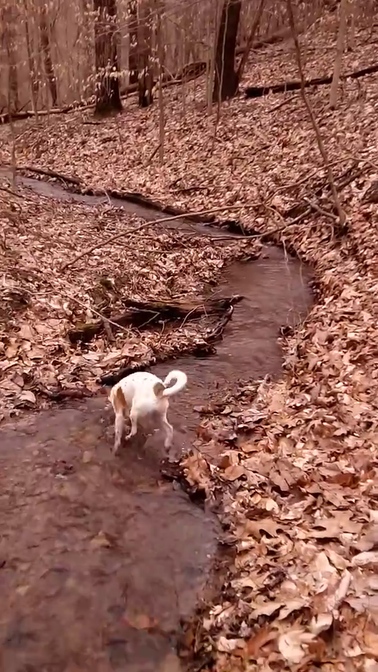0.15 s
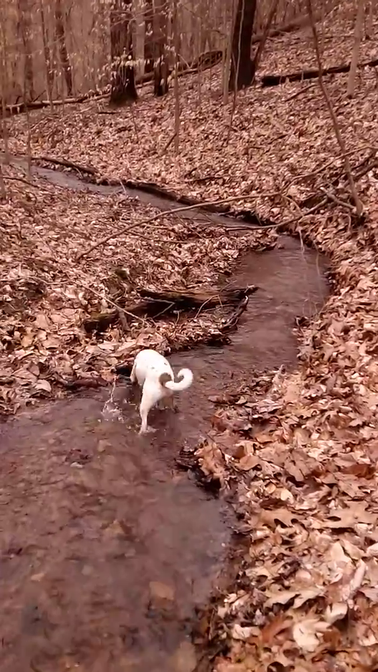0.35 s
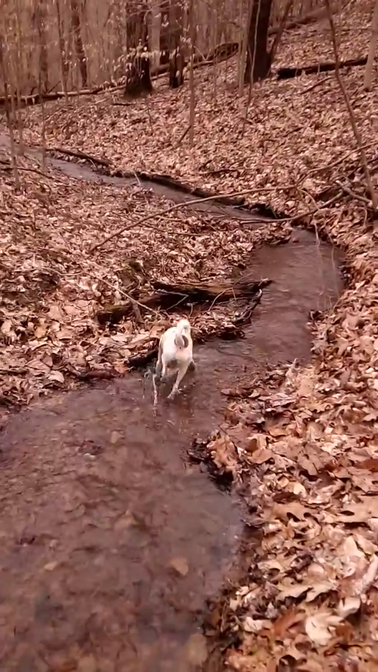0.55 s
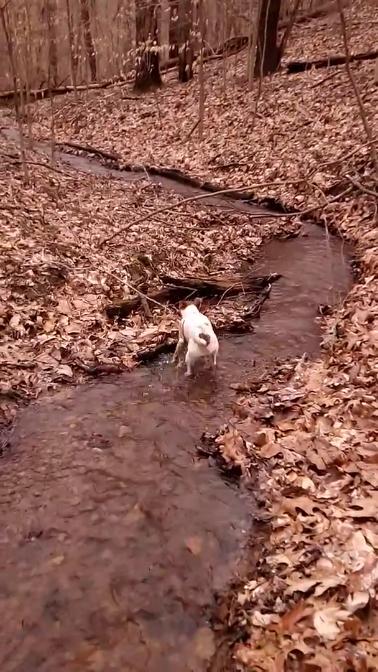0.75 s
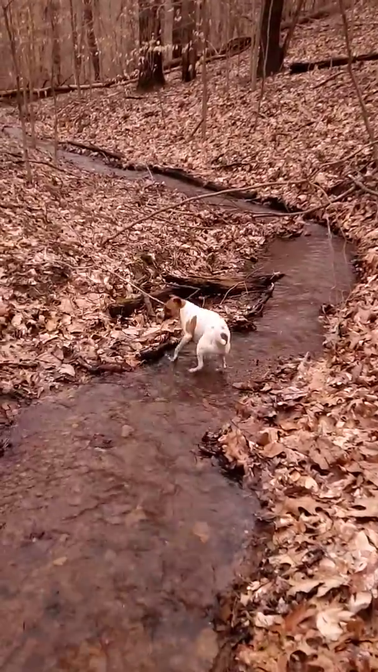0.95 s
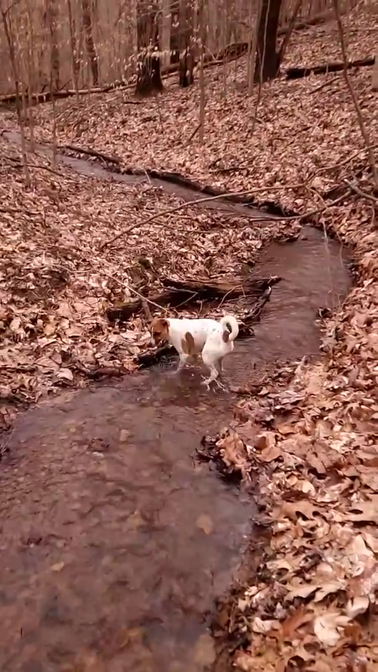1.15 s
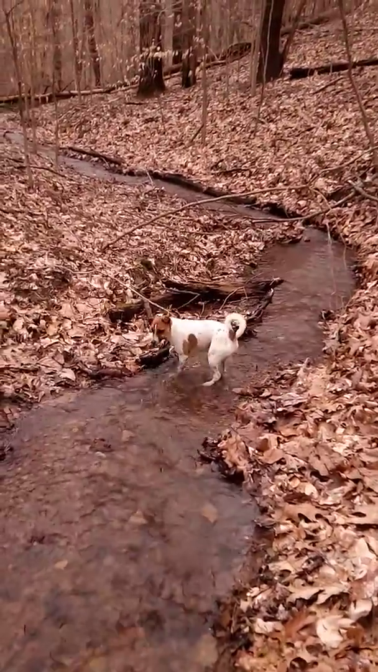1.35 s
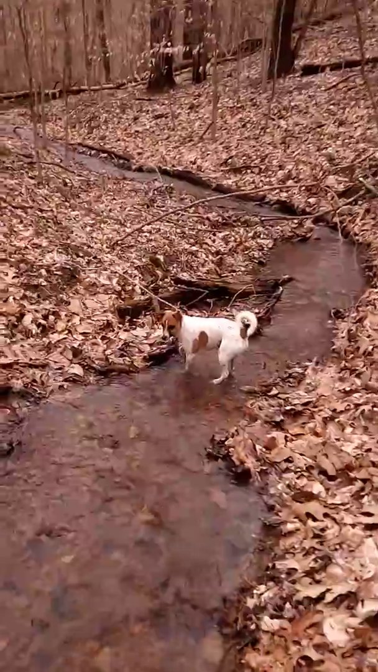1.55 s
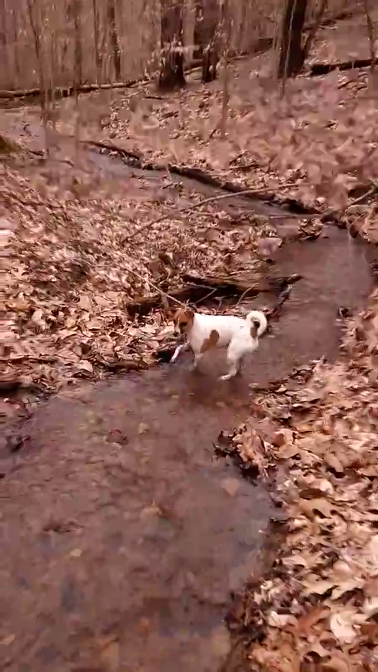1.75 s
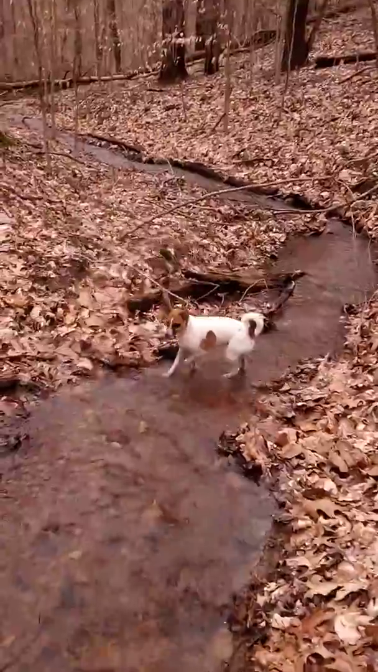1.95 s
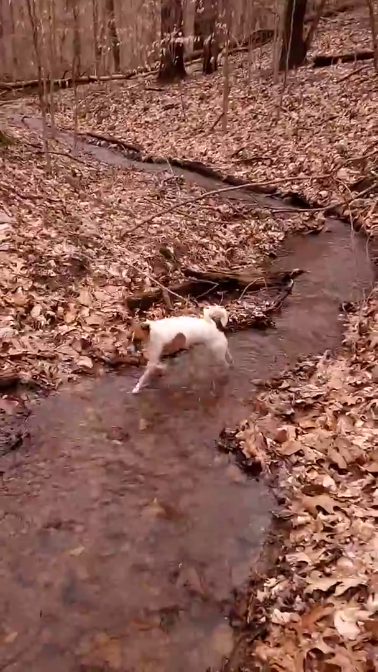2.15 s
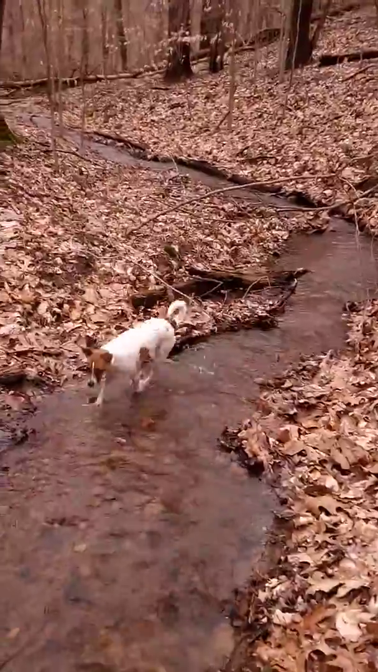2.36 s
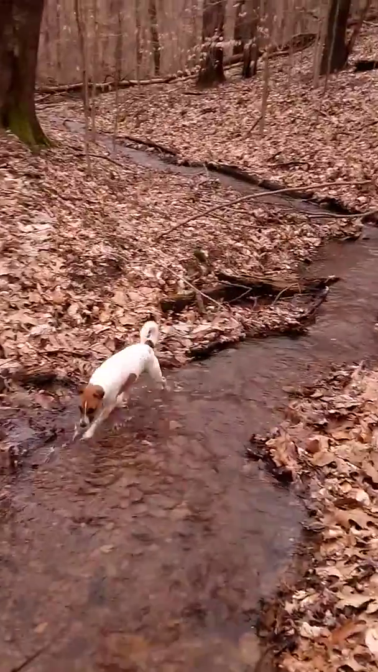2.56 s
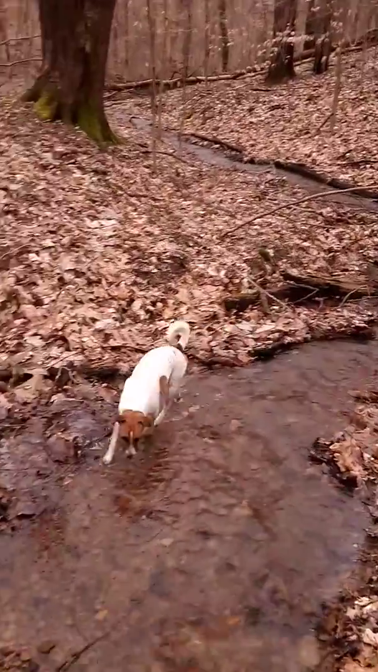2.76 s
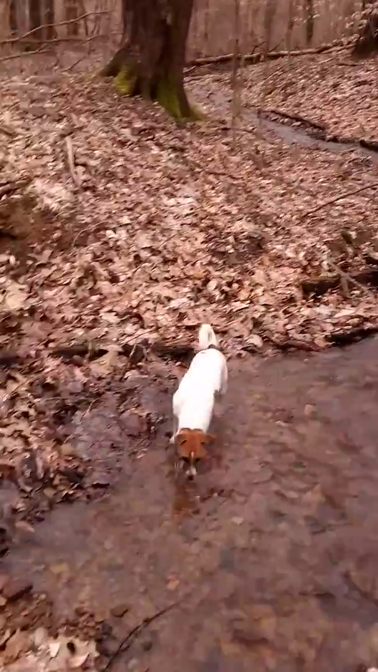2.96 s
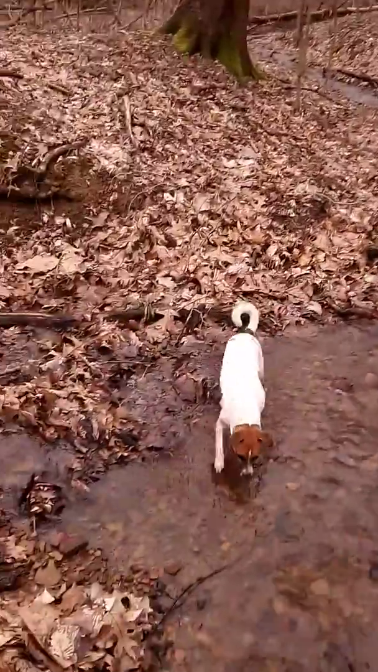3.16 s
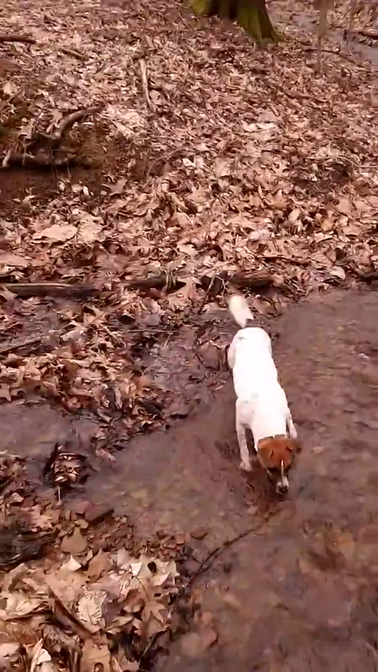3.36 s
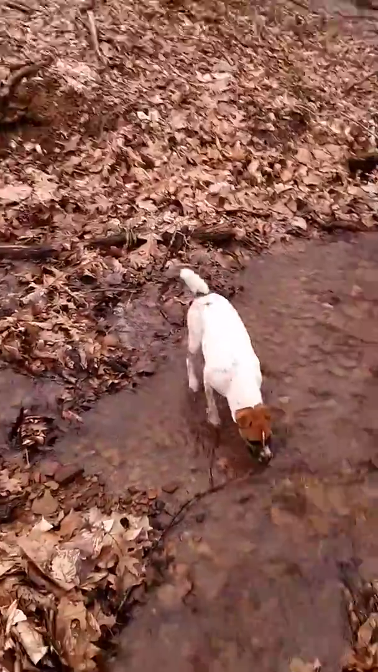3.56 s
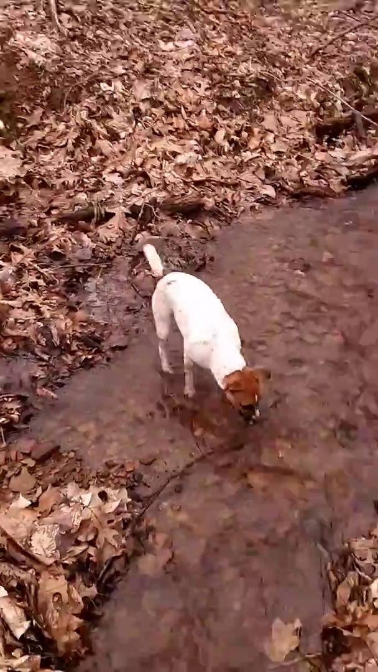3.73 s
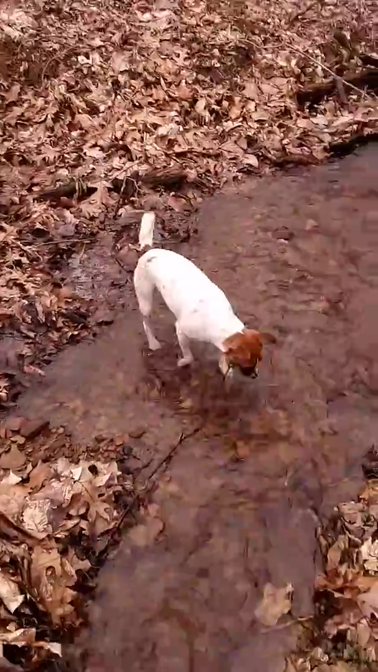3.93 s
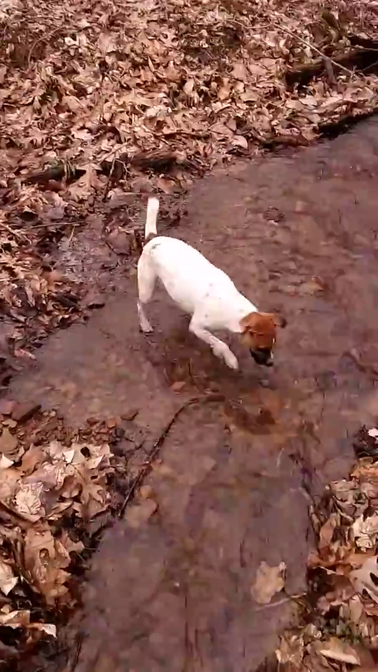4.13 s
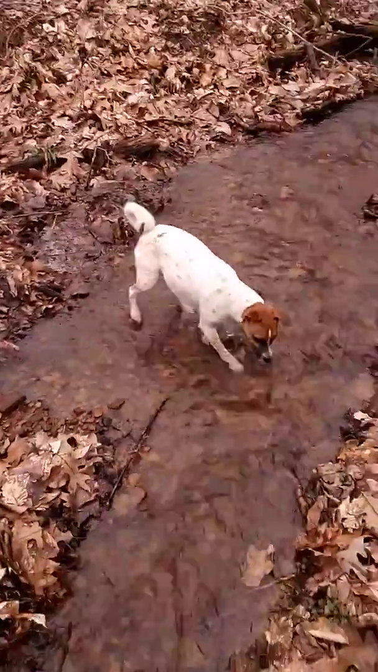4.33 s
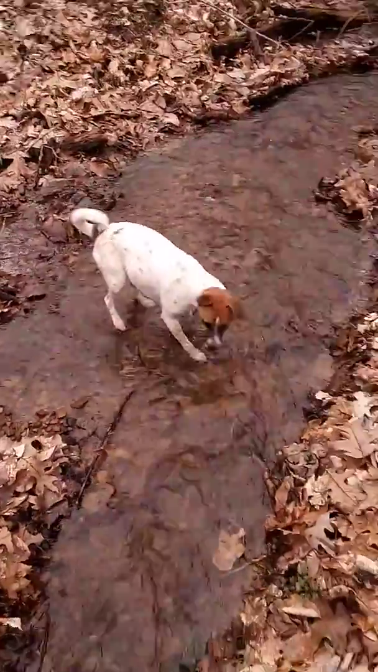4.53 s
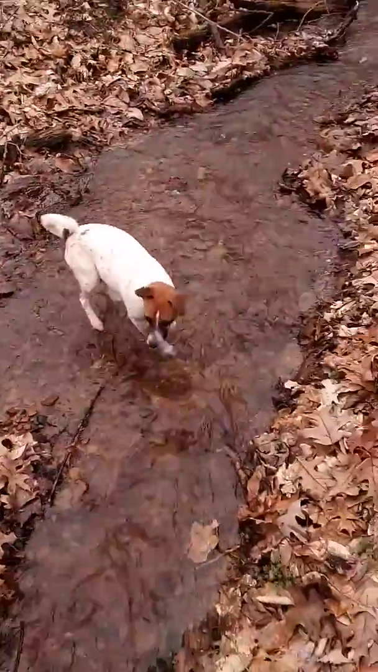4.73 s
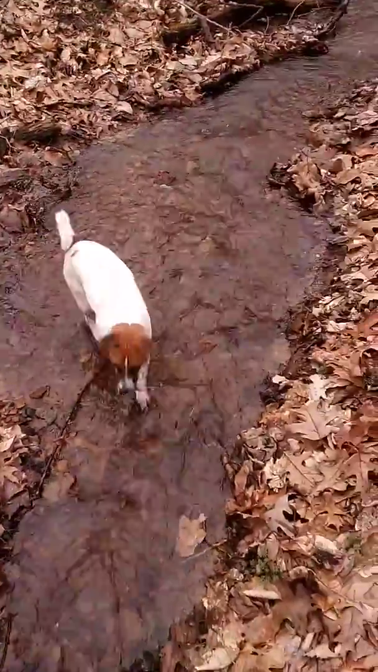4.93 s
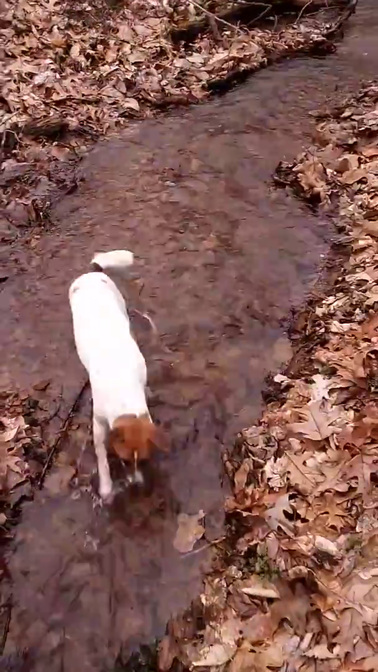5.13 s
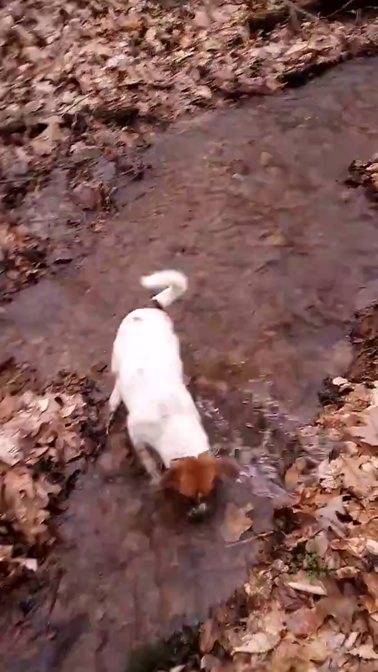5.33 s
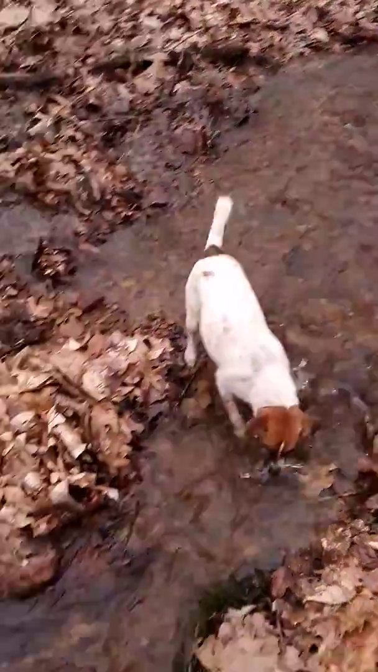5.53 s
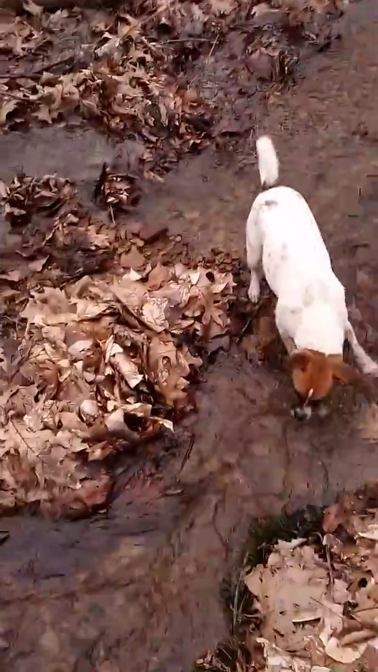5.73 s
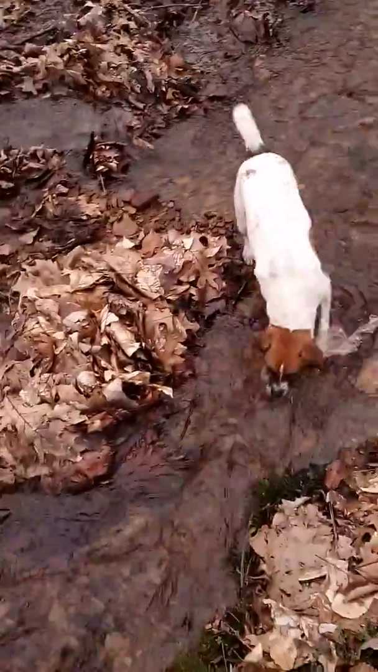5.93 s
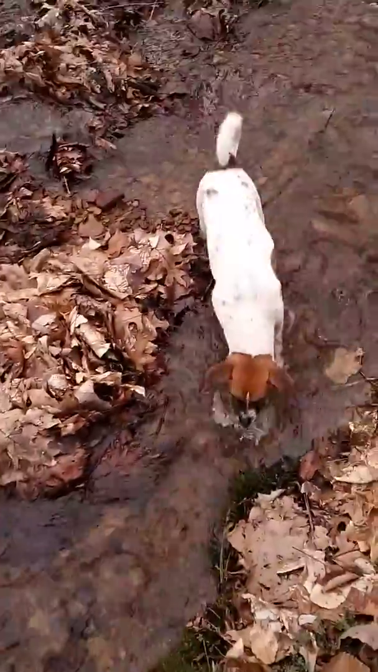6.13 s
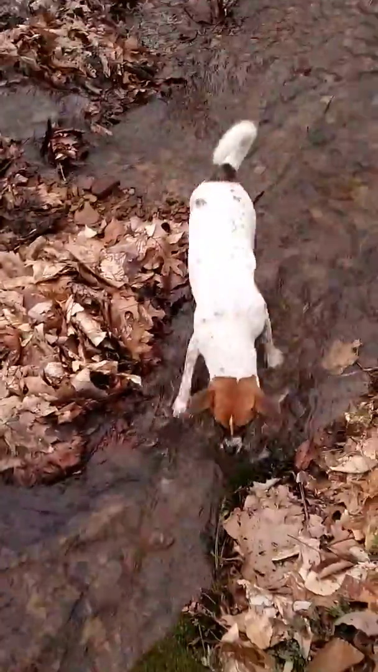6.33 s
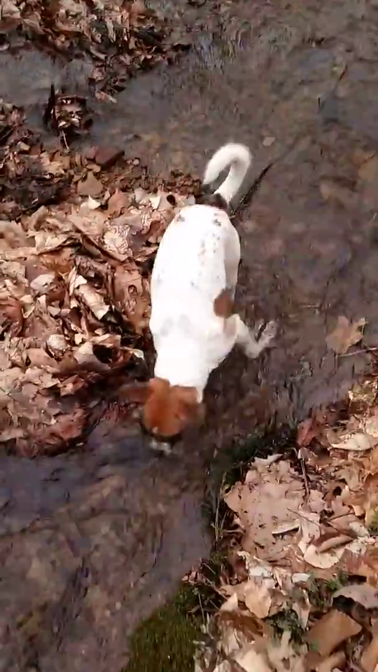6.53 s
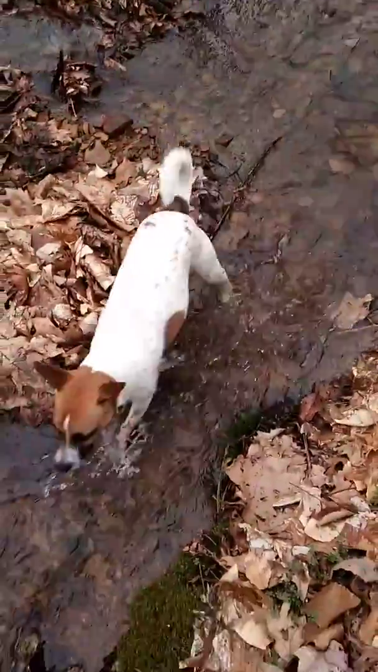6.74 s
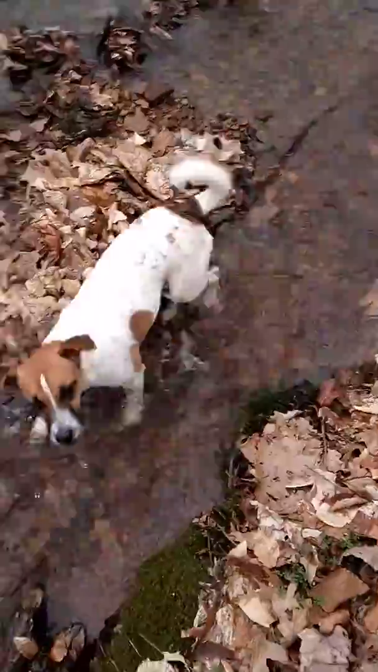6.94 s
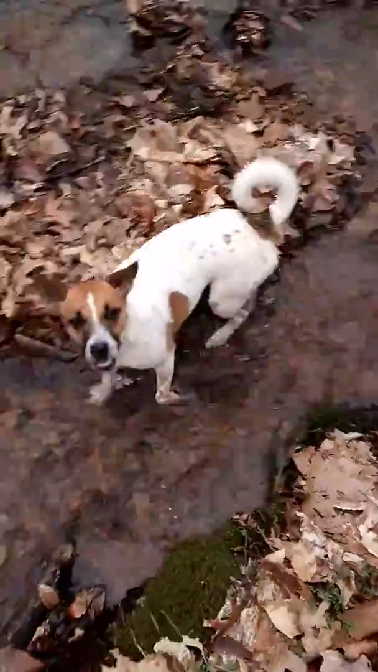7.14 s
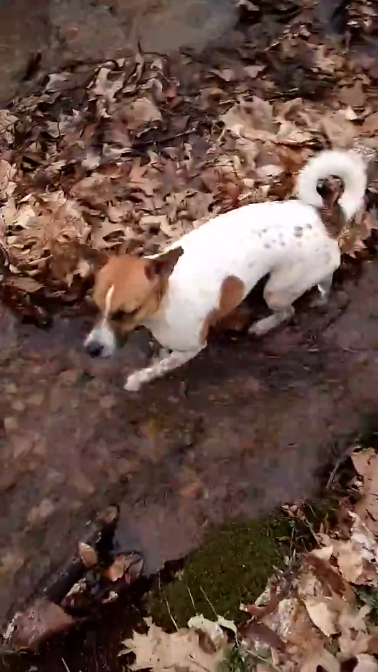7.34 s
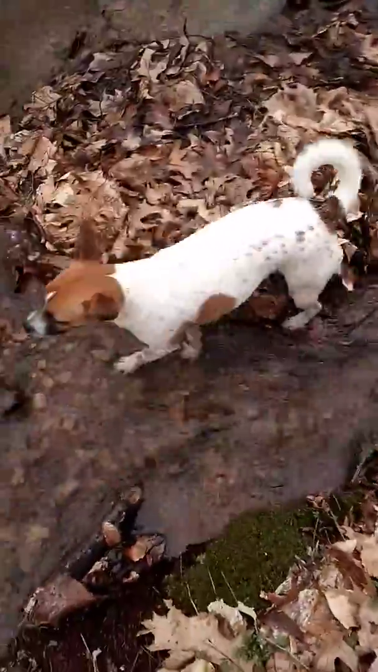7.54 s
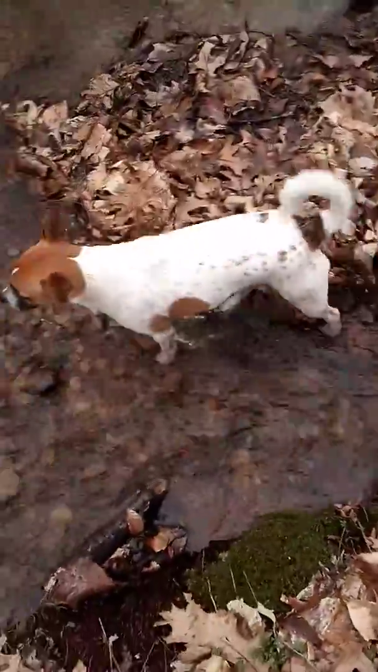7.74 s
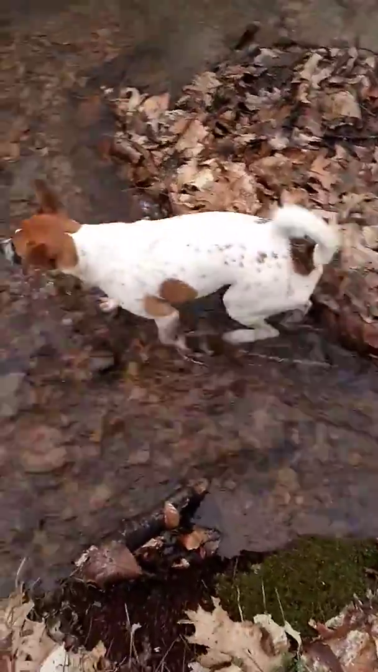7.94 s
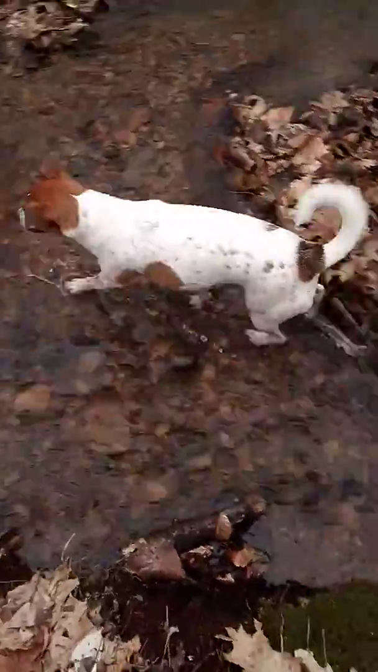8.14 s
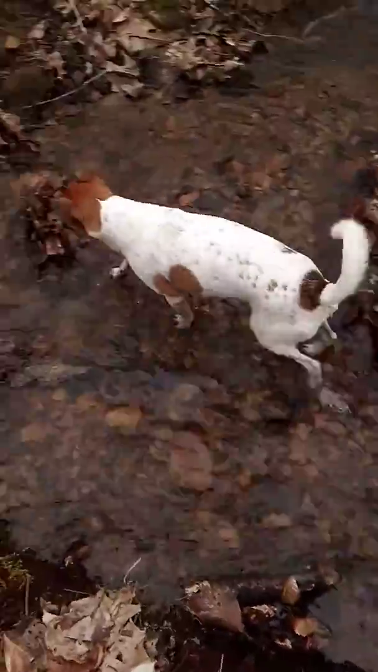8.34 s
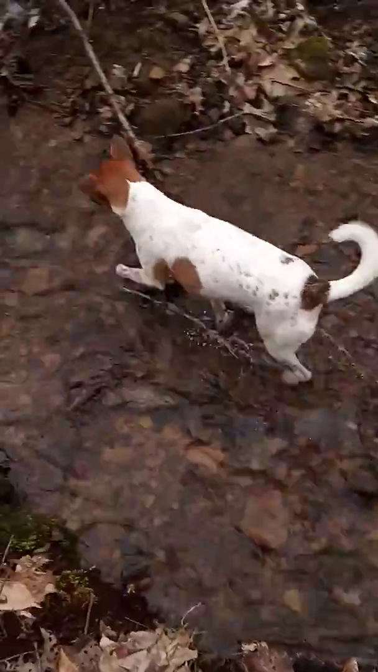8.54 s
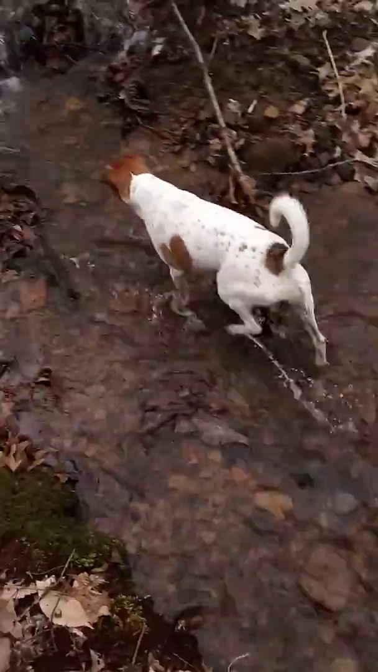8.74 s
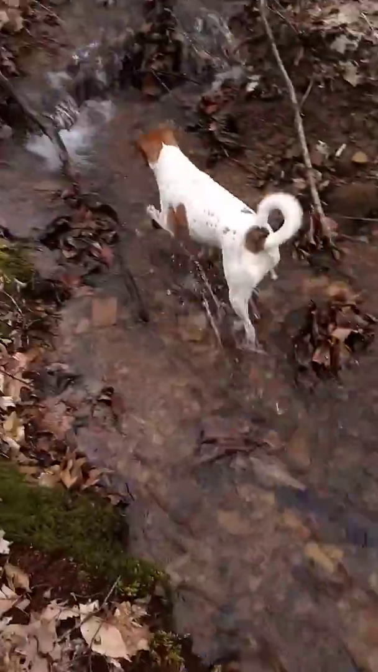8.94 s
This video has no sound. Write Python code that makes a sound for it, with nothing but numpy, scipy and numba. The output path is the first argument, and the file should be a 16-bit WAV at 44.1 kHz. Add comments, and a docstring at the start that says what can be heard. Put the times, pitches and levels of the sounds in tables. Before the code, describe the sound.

A shallow woodland creek babbles over stones while a small dog wades and splashes, the water growing louder and brighter toward a riffle.

```python
"""You hear a shallow woodland creek babbling over stones while a small dog splashes and plops about in it.
The water grows louder and brighter as the microphone follows the dog towards a riffle.
The creek is swarms of short ringing bubbles over a soft wash of noise; deep glugs and a faint rumble lie below.
Paws and muzzle throw up splashes, each a ringing bubble with a burst of spray and late droplets.
They also drag up bright swishes and churn up clusters of bubbles; single plops and drips ring out."""
import sys
import numpy as np
from scipy import signal
from scipy.fft import rfft, irfft, next_fast_len
from scipy.io import wavfile
from numba import njit

SR = 44100
rng = np.random.default_rng(int(sys.argv[2]) if len(sys.argv) > 2 else 0)


def master_out(mix):
    """Clip the mix to full scale and print it as 16-bit PCM to the path in sys.argv[1]."""
    frames = np.transpose(np.atleast_2d(mix))
    ceiling = np.clip(frames, -1, 1)
    pcm = np.round(ceiling * 32767).astype(np.int16)
    wavfile.write(sys.argv[1], SR, pcm)


N = 400428   # length in samples

# Faint, dull low bumps. Each row: start in seconds, relative peak in dB, pitch in Hz.
BUMPS = [(5.44, -72, 80), (5.87, -69, 85), (6.21, -62, 190), (6.66, -66, 75), (6.72, -59, 160),
         (6.80, -65, 78), (6.94, -68, 110), (7.069, -53, 195)]
RUMBLE_DB, RUMBLE_WAVER_DB = -89, 2   # middle level, and how far it wavers
# The loudest single glugs under the ledge. Each row: start in seconds, relative peak in dB, pitch in Hz.
LOUD_GLUGS = [(0.126, -58, 242), (0.323, -51, 330), (0.551, -62, 261), (0.965, -55.5, 320),
              (1.124, -49, 299), (1.294, -52, 317), (1.752, -52, 420), (1.877, -58, 270), (2.055, -54, 331),
              (2.233, -55, 310), (3.301, -56, 363), (3.603, -56, 283), (4.052, -48.5, 318),
              (4.819, -53, 301), (5.024, -57, 420), (5.502, -52, 245), (5.962, -54, 331), (6.489, -63, 328),
              (7.396, -50, 350), (7.639, -54, 304), (7.918, -55, 301), (8.097, -56, 366), (8.566, -52, 353),
              (8.783, -56, 382)]
GLUG_DB = -69.5   # level of the steady glugging
GLUG_WAVER_DB, GLUG_WAVER_HZ = 2.5, 6   # how far and how fast the birth of its bubbles wavers
# Colour of the water at the microphone. Each row: frequency in Hz, filter gain in dB.
WATER_COLOUR = [(59, -74), (100, -10), (177, -6.5), (233, -12), (314, 1.5), (388, -4.5), (544, -7),
                (732, -2), (1270, -6.5), (1900, -8.5), (2450, -4), (2720, -6.5), (4720, -8.5), (6630, -4),
                (8190, -16.5), (9500, -15.5), (12800, -26), (14100, -28), (14900, -14), (15800, -15)]
# A hollow in the water's colour that shifts as the microphone moves.
# Each row: time in seconds, centre in Hz, depth in dB (below zero is a hump).
HOLLOW = [(0, 1380, 2.5), (1.5, 1430, 5.5), (2.5, 1220, 8.5), (3.8, 1080, 3.5), (4.7, 1310, 4),
          (5.8, 1220, 6), (6.8, 1530, -2), (7.15, 1730, 4), (7.8, 1840, 11), (8.3, 1470, 2),
          (9.08, 1610, 8)]
# Creek level by bubble size as the microphone moves along. Each row: time in seconds, then the
# relative levels in dB of burble, gurgle, babble, trickle and fizz (large bubbles to small).
FLOW = [(0.0, -71.5, -60, -54.5, -53.5, -52.5), (1.39, -69.5, -59, -58, -62.5, -57),
        (1.52, -78, -61.5, -56.5, -63, -56.5), (1.69, -81, -60, -56.5, -57.5, -54.5),
        (1.92, -71, -60, -55, -60.5, -57), (2.25, -74, -60.5, -53.5, -57.5, -52.5),
        (3.03, -73, -56, -50.5, -60, -53.5), (3.61, -67, -55.5, -54, -59, -53.5),
        (3.74, -78, -55.5, -53.5, -59.5, -55), (4.55, -79, -61, -55, -62, -56.5),
        (4.87, -73, -57, -53, -58.5, -54.5), (4.93, -72, -57.5, -50.5, -52, -50.5),
        (5.21, -67.5, -53, -50.5, -52.5, -50), (6.12, -67, -52, -51.5, -51, -51),
        (6.25, -62, -54.5, -52.5, -56.5, -53.5), (6.34, -66, -55.5, -53.5, -49.5, -47.5),
        (6.55, -66, -54, -51.5, -49, -48.5), (6.98, -65.5, -55, -54.5, -55, -51),
        (7.42, -65, -58.5, -55, -53.5, -50.5), (7.99, -61, -55, -54, -47, -47.5),
        (8.3, -61.5, -54, -60, -47.5, -48), (8.72, -57, -56, -51, -44.5, -44.5),
        (9.08, -62.5, -64, -53, -48.5, -47)]
# The borders between those five ranges of pitch, in Hz.
RANGE_EDGES_HZ = [620, 1250, 2200, 4500]
# The same five ranges; the large bubbles come least evenly. Each row: extra gain in dB, waver in dB.
RANGE_WAVERS = [(1.5, 3.5), (-0.2, .5), (-0.1, 0.36), (-0.5, 1.34), (0.8, 0.32)]
WAVER_HZ = 6.8   # speed of that waver
TOP_FOLLOWS, TOP_DB = 0.67, -6   # above 8.5 kHz: extra share of the fizz's swing, and gain in dB
RIFFLE_S, RIFFLE_HALF_S, RIFFLE_DB = 8.7, 0.62, -47.5   # closest approach, half its length, level
# Paws swishing through the surface. Each row: start in seconds, relative level in dB,
# time to die away by 60 dB in seconds.
SWISHES = [(0.148, -24.5, 0.032), (0.275, -40, 0.17), (0.43, -38, 0.26), (0.518, -37.5, .2),
           (0.687, -40, 0.085), (1.924, -36, 0.18), (2.02, -37, .18), (2.1196, -37, .18),
           (2.308, -39, 0.28), (2.514, -41, 0.24), (2.8094, -35, 0.1), (3.112, -34, 0.088),
           (3.972, -39, .15), (4.604, -35.5, .11), (4.8884, -33, 0.12), (4.9387, -40, .18),
           (4.995, -33.5, 0.21), (5.03, -33, .15), (5.243, -30.5, 0.28), (5.8162, -32, 0.17),
           (6.3494, -34.5, 0.25), (6.5695, -30, 0.13), (6.79, -28, 0.051), (8.01, -29, .06),
           (8.2072, -28, .14), (8.297, -24, .015), (8.5594, -24, 0.12)]
# The dog churns the water and stirs up loose ringing drops.
# Each row: middle in seconds, half length in seconds, level in dB.
CHURNS = [(0.462, 0.084, -54), (2.34, 0.018, -48), (5.197, 0.22, -68), (5.655, 0.058, -46),
          (5.835, 0.062, -53), (6.38, 0.027, -44), (6.51, 0.041, -48), (6.644, 0.05, -49),
          (8.487, 0.032, -43)]
# Gulps, where a paw or the muzzle churns a cluster of bubbles under.
# Each row: start in seconds, relative bubble peak in dB, middle pitch in Hz, length in seconds.
GULPS = [(0.003, -29.5, 3600, 0.05), (0.213, -37, 3300, .09), (0.315, -37, 2920, 0.011),
         (0.43, -39, 2180, .03), (0.521, -32.5, 3400, .025), (1.945, -30.5, 3100, 0.03),
         (2.132, -32, 2470, 0.028), (2.198, -32.5, 2900, 0.037), (2.366, -35.5, 1820, .02),
         (2.42, -40, 2140, 0.028), (3.97, -36, 3680, 0.012), (4.075, -37, 1390, 0.024),
         (4.939, -36, 1660, 0.015), (5.022, -36, 860, 0.021), (5.064, -32, 2480, .01),
         (5.133, -45, 2100, 0.019), (5.226, -38.5, 790, 0.028), (5.237, -30, 2200, .025),
         (5.493, -31, 2200, .012), (5.613, -32, 2090, 0.015), (5.633, -39, 2700, 0.056),
         (5.814, -27, 2600, 0.042), (5.815, -32, 1110, 0.026), (5.86, -34, 2430, .04),
         (6.019, -29, 2330, 0.014), (6.182, -28.5, 4430, 0.0088), (6.209, -34, 1900, 0.006),
         (6.298, -38, 950, .02), (6.316, -28, 2500, .009), (6.351, -34, 2970, .05),
         (6.455, -28, 2740, 0.012), (6.576, -21.5, 3150, 0.011), (6.624, -34, 2500, 0.057),
         (8.204, -29, 3300, .028), (8.331, -30, 2700, 0.019), (8.416, -31, 2310, 0.015),
         (8.486, -32, 2900, 0.045), (8.56, -23, 5260, 0.023), (8.672, -31, 2900, .008),
         (8.704, -29, 3600, .012), (8.717, -19, 4230, 0.005), (8.943, -25, 2920, .008),
         (8.984, -30.5, 2410, 0.043)]
GULP_BUBBLES = 14   # bubbles in each cluster
# Single bubbles that ring out, from deep plops to small, high drips.
# Each row: start in seconds, relative peak in dB, pitch in Hz, cycles of ringing.
PLOPS = [(0.012, -32, 3780, 32), (0.036, -35, 3600, 45), (0.186, -28.5, 426, 4), (0.770, -40, 1150, 20),
         (1.109, -34.5, 2250, 26), (1.134, -35, 1160, 12), (1.214, -33.5, 1010, 13), (2.418, -36, 2490, 40),
         (2.961, -32, 1420, 16), (3.17, -42, 790, 16), (3.183, -36, 800, 22), (3.552, -38, 870, 19),
         (3.682, -36, 740, 33), (3.750, -31.5, 6700, 53), (4.068, -27, 490, 11), (4.076, -28, 895, 12),
         (4.401, -34.5, 950, 18), (5.021, -36, 880, 20), (5.025, -36.5, 464, 13), (5.030, -36, 1020, 31),
         (5.036, -38, 695, 20), (5.058, -38, 810, 18), (5.239, -39, 694, 27), (5.419, -34, 1020, 29),
         (5.496, -26.5, 1950, 21), (5.508, -32, 4500, 25), (5.579, -24.5, 1430, 11), (5.635, -27, 3300, 31),
         (5.816, -33, 3500, 38), (5.819, -28, 1070, 11), (5.923, -29, 2200, 28), (5.97, -30, 1530, 30),
         (6.209, -29, 1120, 12), (6.638, -27, 2070, 22), (7.302, -34.5, 780, 28), (7.423, -33, 3000, 30),
         (7.453, -35.5, 730, 23), (7.566, -28, 1240, 13), (7.581, -29, 4260, 30), (7.610, -33, 1170, 18),
         (7.702, -27, 3310, 31), (7.74, -32, 704, 12), (7.830, -36, 765, 16), (8.053, -28, 685, 13),
         (8.078, -33, 765, 18), (8.175, -35, 660, 17), (8.362, -36, 787, 21), (8.482, -28, 3910, 30),
         (8.512, -21, 2260, 22), (8.604, -28, 1270, 27), (8.635, -26, 7450, 40), (8.717, -31, 810, 16),
         (8.877, -24, 3630, 25), (8.944, -36.5, 353, 11)]
# Splashes. Each row: time in seconds, relative peak in dB, pitch of the main bubble in Hz,
# spray against that peak in dB, time for the spray to die away by 60 dB in seconds.
SPLASHES = [(0.185, -27, 5170, 7, 0.017), (0.316, -22, 6200, 2.5, .028), (0.360, -32, 6000, 10, 0.0076),
            (0.523, -26, 3620, -10, .04), (0.54, -23, 2830, -11, 0.051), (0.689, -28, 6540, -5, 0.023),
            (0.873, -29, 6340, 2.5, 0.028), (0.935, -27.5, 1780, -3, .02), (1.4436, -23.5, 1990, -25, .02),
            (2.031, -27, 2400, 3, .018), (2.087, -26, 5070, -16, .02), (2.1195, -28, 2400, -3, .018),
            (3.072, -24, 6300, -2, 0.024), (3.116, -26, 3050, 1, 0.03), (3.775, -35, 6400, -5, 0.017),
            (3.898, -21.5, 6200, -3, 0.015), (3.972, -24.5, 3730, 1, 0.029),
            (4.068, -19.5, 3580, -1, 0.012), (4.075, -29.5, 1590, 1, 0.084), (4.087, -25, 5400, -4, 0.016),
            (4.095, -32, 5050, 0, 0.026), (4.1322, -24.5, 3900, -13, .02), (4.139, -25, 5900, -12, .02),
            (4.34, -33, 3000, -12, .02), (4.76, -27, 3050, -7, .02), (4.889, -26, 1670, 2, 0.023),
            (5.1037, -21.5, 2100, 1, 0.02), (5.187, -21, 2290, 1, 0.023), (5.4876, -19, 2400, -10, 0.018),
            (5.508, -15.5, 6850, -4, 0.012), (5.6156, -23, 2140, -13, .02), (5.727, -15, 6670, -12, .02),
            (5.752, -16, 6600, -16, .02), (5.832, -28, 2600, 3, 0.048), (5.8646, -18, 2400, -12, .012),
            (5.893, -17.5, 3200, -15, .018), (5.955, -23, 1780, -19, .02), (6.118, -19, 1970, -8, 0.018),
            (6.184, -19, 4440, -5, 0.027), (6.213, -17.5, 2350, -10, .015), (6.317, -16, 2370, -2, 0.027),
            (6.4019, -13, 6600, -5, .012), (6.422, -18, 6500, -6, 0.035), (6.452, -17, 3550, -15, .008),
            (6.458, -17, 3430, -12, 0.028), (6.569, -19, 3400, -9, .02), (6.583, -17.5, 6230, 8, 0.0096),
            (6.605, -18, 2360, -4, 0.016), (6.639, -27, 1930, -6, .008), (6.679, -24, 4250, -6, .02),
            (6.784, -21, 3830, 1, 0.013), (6.794, -25, 6540, -1, 0.028), (7.63, -20.5, 2730, 0, 0.036),
            (7.691, -28, 2550, 2, 0.028), (7.8017, -22.5, 2720, 1, .015), (8.018, -16, 4100, -6, 0.04),
            (8.055, -14, 5760, -7, 0.016), (8.161, -16.5, 5960, -1, .006), (8.2166, -15, 2230, -1, 0.03),
            (8.2276, -22, 2370, 2, 0.028), (8.3367, -22, 2430, -1, .05), (8.382, -11, 5940, -3, 0.015),
            (8.423, -14, 6640, 3.5, 0.014), (8.481, -13.5, 6740, -12, .035), (8.496, -17, 6860, -3, 0.021),
            (8.508, -22, 2760, -1, .03), (8.5226, -10.5, 2360, -13, 0.018), (8.602, -11.5, 6500, -5, 0.017),
            (8.6216, -21, 6600, 4, 0.017), (8.675, -18.5, 2560, 0, 0.022), (8.717, -20, 4530, 7, 0.036),
            (8.769, -17, 6660, -10, .015), (8.8253, -18, 2620, -5, 0.032), (8.8756, -16, 2750, -12, 0.013),
            (8.889, -21, 2580, 0, .03), (8.9449, -9.5, 2540, -7, .015), (8.949, -10.5, 3180, -11, .02),
            (8.958, -15.5, 6550, -5, 0.025), (8.964, -20, 2090, 4.5, 0.015), (9.001, -9.5, 6700, -9, 0.024),
            (9.055, -11, 6630, -16, 0.011), (9.06, -9, 2870, 1, 0.011)]
SPRAY_GATHER_S, SPRAY_GATHER_DB = 0.021, -12   # spray builds up before the slap: 60 dB rise time, level under it
CUTOFF_HZ = 15900   # top of the sound


def from_db(db):
    """Decibels to gain."""
    return 10 ** (np.asarray(db) / 20)


def rms_one(x):
    """Scale to an rms (average strength) of 1."""
    return x / np.sqrt(np.mean(x ** 2) + 1e-20)


def butter(x, hz, kind, order=2):
    """Keep one part of the pitch range with a Butterworth filter."""
    return signal.sosfilt(signal.butter(order, hz, kind, fs=SR, output="sos"), x + 1e-18)


def drift(rate):
    """Smooth chance with a spread of about 1: random numbers smoothed to change about rate times a second."""
    step = 40   # samples between the slow points
    r = np.exp(-2 * np.pi * rate * step / SR)
    noise = rng.standard_normal(N // step + 2002)
    slow = signal.lfilter([1], [1, -2 * r, r * r], noise)[2000:]   # skip the filter's start
    return np.interp(np.arange(N) / step, np.arange(len(slow)), rms_one(slow))


def in_time(rows):
    """The columns of a timed table, drawn out sample by sample."""
    s, *columns = np.transpose(rows)
    return [np.interp(np.arange(N) / SR, s, c) for c in columns]


def coloured(x, points):
    """Filter with the gains of a table, reacting as early as it can (minimum phase)."""
    size = next_fast_len(N + SR // 4, True) // 2 * 2
    hz, db = np.transpose(points)
    bin_hz = np.arange(size // 2 + 1) * SR / size
    log_gain = np.log(from_db(np.interp(np.log(bin_hz + 1), np.log(hz), db)))
    # folding the cepstrum forward in time gives the minimum phase
    cepstrum = irfft(log_gain)
    cepstrum[1:size // 2] *= 2
    cepstrum[size // 2 + 1:] = 0
    return irfft(rfft(x, size) * np.exp(rfft(cepstrum)))[:N]


@njit
def moving_band(x, hz, width_hz):
    """A resonance with a gain of 1 at its moving centre."""
    out, low, band = np.zeros(N), 0., 0.
    for i in range(N):
        step = 2 * np.sin(np.pi * hz[i] / SR)
        damping = width_hz / hz[i]
        low += step * band
        band += step * (x[i] - low - damping * band)
        out[i] = damping * band
    return out


def bursts(s, db, t60):
    """An envelope that jumps by each level and dies away by 60 dB in each time t60."""
    out = np.zeros(N + SR)
    for first, level_db, decay_s in zip(np.maximum(s * SR, 0).astype(int), db, t60):
        t = np.arange(int(min(decay_s, 1) * SR)) / SR
        out[first:first + len(t)] += from_db(level_db - 60 * t / decay_s)
    return out[:N]


@njit
def bubbles(start_s, height, hz, cycles, rise, swell):
    """Each bubble is a sine that builds up over swell cycles, dies 60 dB in its cycles and rises in pitch."""
    out = np.zeros(N)
    for k in range(len(hz)):
        first = int(start_s[k] * SR)
        life = cycles[k] * SR / hz[k]   # in samples
        for i in range(max(0, -first), min(int(life), N - first)):
            turns = hz[k] * i / SR * (1 + rise * i / life / 2)
            envelope = (1 - np.exp(-turns / swell)) * np.exp(-np.log(1000) * i / life)
            out[first + i] += height[k] * envelope * np.sin(2 * np.pi * turns)
    return out


def swarm(low_hz, high_hz, cycles, spread_db, rise, swell, surge, count):
    """Bubbles born at random, most of them when the water surges; about even power per Hz, rms 1."""
    when, pitch, size, life, sign = rng.random((count, 5)).T
    start_s = np.interp(when, np.cumsum(surge) / np.sum(surge), np.arange(N) / SR)
    hz = low_hz * (high_hz / low_hz) ** pitch
    loudness_db = spread_db * np.minimum(-np.log(size), 4.2)   # a few stand far out
    height = from_db(loudness_db) * np.sign(sign - .5) * hz / high_hz
    ringing = cycles * 2 ** (2 * life - 1)   # half to double
    return rms_one(bubbles(start_s, height, hz, ringing, rise, swell))


def air():
    """A very faint, wavering low rumble of filtered noise with a few dull bumps."""
    s, db, hz = np.transpose(BUMPS)
    bumps = bubbles(s, from_db(db), hz, np.full(len(s), 12.0), rise=.1, swell=0.97)
    level_db = RUMBLE_DB + RUMBLE_WAVER_DB * drift(rate=3.6)
    rumble = rms_one(butter(rng.standard_normal(N), [60, 120], "band", order=1))
    return bumps + from_db(level_db) * rumble


def glugs():
    """Water folding under a ledge keeps up a soft, deep, uneven glugging, with louder single glugs standing out."""
    surge = from_db(GLUG_WAVER_DB * drift(GLUG_WAVER_HZ))
    steady = swarm(231.0, 351, cycles=12.6, spread_db=4.5, rise=0.042, swell=2.3, surge=surge, count=600)
    s, db, hz = np.transpose(LOUD_GLUGS)
    loud = bubbles(s, from_db(db + 2.5), hz, np.full(len(s), 24.0), rise=0.069, swell=1.0)
    return butter(from_db(GLUG_DB) * steady + loud, 126, "high")


def babbling():
    """Wavelets break over stones in quick surges, each shedding bubbles of many sizes over a wash of far water."""
    surge = from_db(2.3 * drift(rate=38))
    gurgle = swarm(405.7, 1316, cycles=22, spread_db=2.5, rise=0.13, swell=2.5, surge=surge, count=3600)
    babble = swarm(1325, 3075, cycles=32, spread_db=3.5, rise=0.17, swell=2.3, surge=surge, count=6000)
    fizz = swarm(2997, 7680, cycles=38, spread_db=3.5, rise=0.078, swell=6.9, surge=surge ** .6, count=18000)
    # the tiniest bubbles ring only very briefly
    ticks = swarm(4050, 17200, cycles=10.5, spread_db=5.0, rise=0.059, swell=8.7, surge=surge, count=16000)
    wash = rng.standard_normal(N) * surge ** .5
    near = from_db(-16.5) * gurgle + from_db(-14.0) * babble + from_db(-10.0) * fizz + from_db(-8.5) * ticks
    water = butter(coloured(near + from_db(-4.0) * wash, WATER_COLOUR), 400, "high")
    hollow_hz, depth_db = in_time(HOLLOW)
    # taking away part of a moving band leaves the hollow
    return water - (1 - from_db(-depth_db)) * moving_band(water, hollow_hz, width_hz=410)


def creek():
    """Each range of bubble sizes follows the nearness of the riffles that make it and wavers by chance."""
    rest, levels, out = babbling(), in_time(FLOW), 0
    for edge_hz, level_db, (gain_db, waver_db) in zip(RANGE_EDGES_HZ + [CUTOFF_HZ], levels, RANGE_WAVERS):
        # split off all that lies below this edge, without delay
        part = signal.sosfiltfilt(signal.butter(6, edge_hz, fs=SR, output="sos"), rest)
        rest = rest - part
        wavering_db = level_db + gain_db + waver_db * drift(WAVER_HZ)
        out = out + rms_one(part) * from_db(wavering_db)
    # the finest spray carries only from close by, so the top opens up with the fizz
    top = signal.sosfiltfilt(signal.butter(4, 8500, "high", fs=SR, output="sos"), out)
    fizz_db = levels[-1]
    top_db = TOP_FOLLOWS * (fizz_db - np.mean(fizz_db)) + TOP_DB
    return out + top * (from_db(top_db) - 1)


def plinks(under_db, cycles, spread_db, rise):
    """Now and then a lone bubble close by rings clear of the babble, at a level that follows it."""
    babble_db = in_time(FLOW)[2]
    lone = swarm(1150, 3110, cycles, spread_db, rise, swell=0.84, surge=np.ones(N), count=260)
    return from_db(babble_db + under_db) * lone


def riffle(cycles, spread_db):
    """A small step in the bed sheds a dense stream of bubbles of nearly one size, heard only from close by."""
    nearness = np.exp(-((np.arange(N) / SR - RIFFLE_S) / RIFFLE_HALF_S) ** 2)
    surge = from_db(1.8 * drift(rate=25))
    stream = swarm(2070, 2820, cycles, spread_db, rise=.06, swell=5, surge=surge, count=7000)
    return from_db(RIFFLE_DB) * nearness * stream


def banks(x, echo_db, t60):
    """The water surface and leafy banks scatter a short, dull echo, made of fading noise."""
    t = np.arange(SR // 5) / SR
    noise = butter(rng.standard_normal(len(t)), 11000, "low")
    tail = noise * from_db(-60 * t / t60) * (t > .002)
    return x + from_db(echo_db) * signal.fftconvolve(x, tail / np.sqrt(np.sum(tail ** 2)))[:N]


def swishes(swell_hz):
    """A paw drags through the surface and tears off a brief, bright shower of fine drops."""
    s, db, t60 = np.transpose(SWISHES)
    drops = swarm(1740, 15000, cycles=24.0, spread_db=1.7, rise=0.072, swell=3.0, surge=np.ones(N), count=50000)
    shower = rms_one(butter(coloured(drops, WATER_COLOUR), 5800, "high"))
    envelope = butter(bursts(s, db, t60), swell_hz, "low", order=1)   # softens the jumps
    return from_db(-13.5) * envelope * shower


def churning(cycles, spread_db, rise):
    """Clusters of clear bubbles swell and fade with each stir of the legs or muzzle."""
    t = np.arange(N) / SR
    stir = sum(from_db(db) * np.exp(-((t - s) / half_s) ** 2) for s, half_s, db in CHURNS)
    drops = swarm(1425, 4750, cycles, spread_db, rise, swell=2.2, surge=np.ones(N), count=2800)
    return stir * rms_one(butter(drops, 2900, "low", order=1))


def gulps(cycles, spread_octaves):
    """A cluster of bubbles of kindred size breaks off in quick succession."""
    s, db, hz, length = np.transpose(GULPS)[:, :, None]
    delay, pitch, size = rng.random((len(GULPS), 3, GULP_BUBBLES)).transpose(1, 0, 2)
    start_s = s + length * (np.arange(GULP_BUBBLES) + delay) / GULP_BUBBLES
    height = from_db(db + 0.5 - 9.5 * size)
    pitch_hz = hz * 2 ** (spread_octaves * (pitch - .5))
    ringing = np.full(delay.size, cycles)
    return bubbles(start_s.ravel(), height.ravel(), pitch_hz.ravel(), ringing, rise=0.11, swell=1.83)


def plops(rise):
    """Single bubbles ring out, from deep plops to small, high drips."""
    s, db, hz, cycles = np.transpose(PLOPS)
    return from_db(1.0) * bubbles(s, from_db(db), hz, cycles, rise, swell=1.11)


def splashes(cycles, spray_top_hz, fall_back_s, droplet_db):
    """Spray gathers into a slap, curt or drawn out, that traps one main bubble; droplets fall back just after."""
    s, db, hz, spray_db, spray_t60 = np.transpose(SPLASHES)
    main = bubbles(s + 0.00055, from_db(db), hz, np.full(len(s), cycles), rise=0.1, swell=3.4)
    froth = swarm(1500, 8890, cycles=16.5, spread_db=2.5, rise=0.12, swell=2.0, surge=np.ones(N), count=16000)
    wet_noise = coloured(froth + rng.standard_normal(N), WATER_COLOUR)
    hiss = rms_one(butter(wet_noise, [1940, spray_top_hz], "band", order=1))
    slaps = bursts(s, db + spray_db, spray_t60)
    # bursts played backwards rise towards each slap
    gather_t60 = np.full(len(s), SPRAY_GATHER_S)
    gathering = bursts(N / SR - s, db + spray_db + SPRAY_GATHER_DB, gather_t60)[::-1]
    spray = from_db(-13.0) * butter(slaps + gathering, 180, "low", order=1) * hiss
    # eight droplets a splash, mostly fainter the later they fall
    delay, pitch, size = rng.random((len(s), 3, 8)).transpose(1, 0, 2)
    drop_s = s[:, None] + fall_back_s * delay ** 2
    drop_height = from_db(db[:, None] + droplet_db - 14 * size - 29 * delay)
    drop_hz = 1900 * 3.7 ** pitch
    ringing = np.full(delay.size, cycles)
    droplets = bubbles(drop_s.ravel(), drop_height.ravel(), drop_hz.ravel(), ringing, rise=0.17, swell=4.8)
    return from_db(3.0) * main + spray + droplets


def scene():
    """The creek and the wading dog between soft banks."""
    stream = creek() + glugs() + riffle(cycles=33, spread_db=4.5)
    stream = stream + plinks(under_db=-14.5, cycles=36, spread_db=5.5, rise=0.099)
    spray = swishes(swell_hz=101)
    spray = spray + splashes(cycles=16.6, spray_top_hz=8400, fall_back_s=0.046, droplet_db=-21)
    single_and_clustered = plops(rise=0.087) + gulps(cycles=19, spread_octaves=1.05)
    stirred = churning(cycles=25, spread_db=3.5, rise=0.075)
    wading = butter(spray + single_and_clustered + stirred, 150, "high")   # the microphone takes little bass
    return (air() + stream + banks(wading, echo_db=-12.5, t60=0.12))[None]


def record(dry):
    """A steep elliptic filter cuts the top."""
    return signal.sosfilt(signal.ellip(10, .1, 70, CUTOFF_HZ, fs=SR, output="sos"), dry)


dry = scene()
out = record(dry)
master_out(out)
```